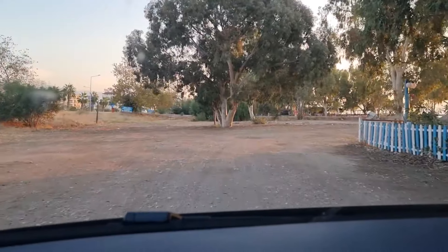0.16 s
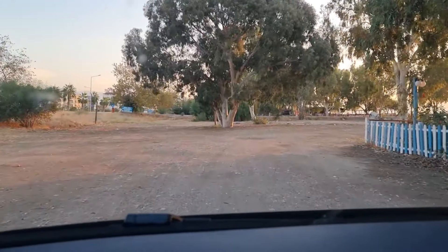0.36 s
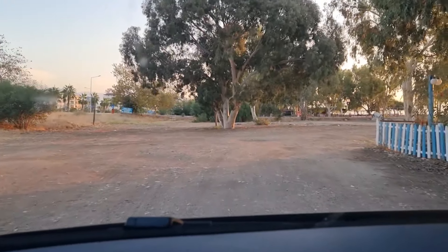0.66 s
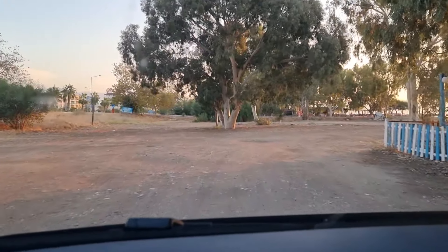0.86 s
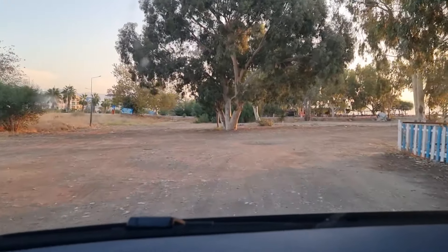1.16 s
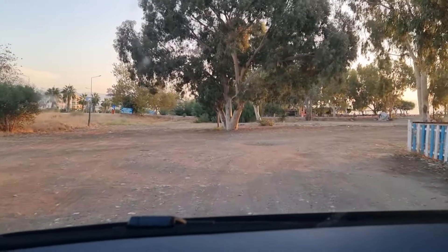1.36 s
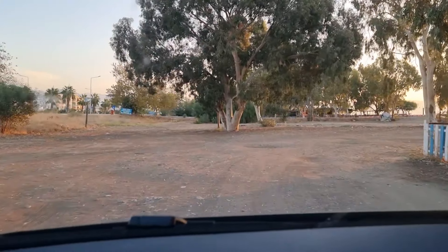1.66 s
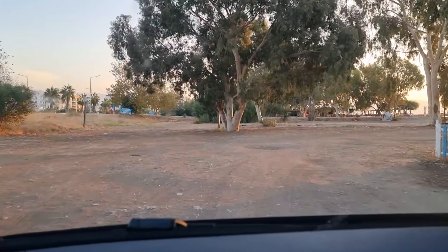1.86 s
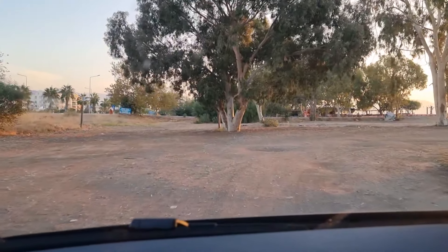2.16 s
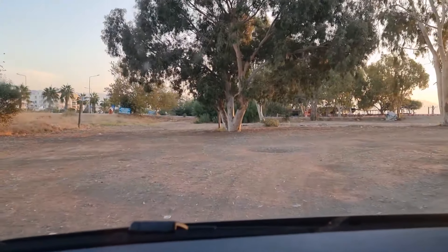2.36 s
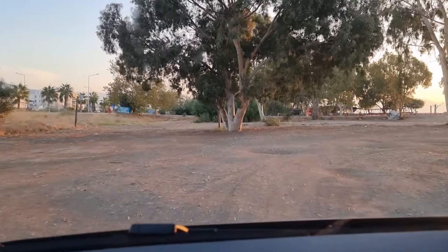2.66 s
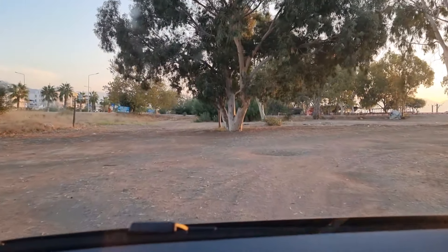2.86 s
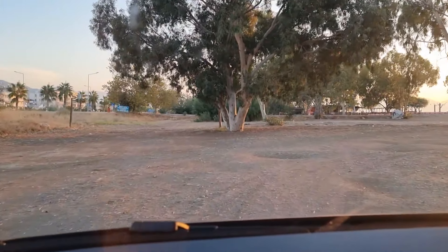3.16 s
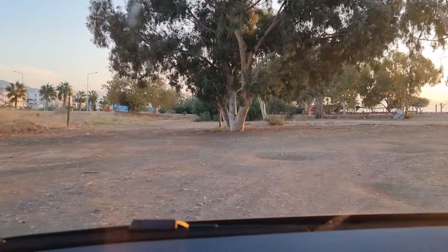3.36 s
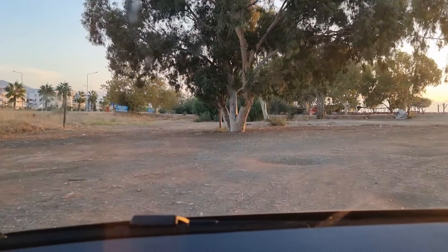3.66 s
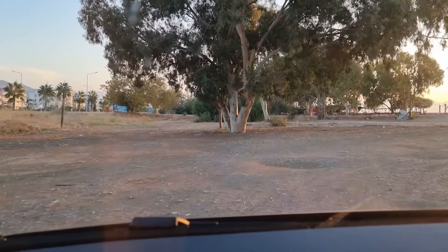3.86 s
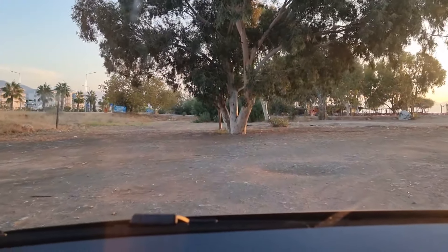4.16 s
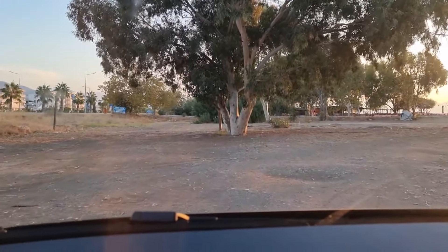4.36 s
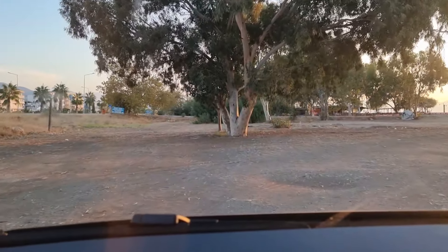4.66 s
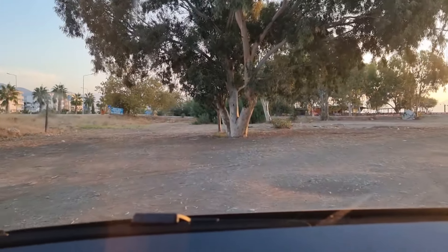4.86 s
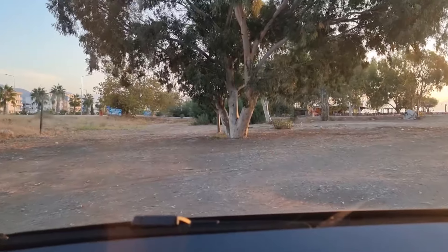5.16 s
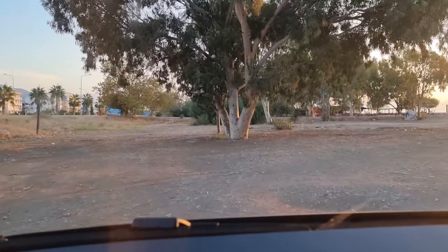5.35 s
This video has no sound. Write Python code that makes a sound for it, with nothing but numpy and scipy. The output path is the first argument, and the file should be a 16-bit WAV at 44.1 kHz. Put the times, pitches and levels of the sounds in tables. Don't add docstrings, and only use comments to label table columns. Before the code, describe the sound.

Inside a slow-rolling small car, deep body boom and tyre rumble over stony dirt, with scattered stone knocks and a growing gravel hiss.

```python
import sys
import numpy as np
from scipy import signal
from scipy.fft import rfft, irfft, next_fast_len
from scipy.io import wavfile
from scipy.ndimage import uniform_filter1d, minimum_filter1d

SR = 44100
rng = np.random.default_rng(int(sys.argv[2]) if len(sys.argv) > 2 else 0)


def makeup_ratio(level_db):
    decades = np.asarray(level_db, float) / 20
    return 10 ** decades


def int16_out(signal):
    q = np.round(np.clip(np.atleast_2d(signal).T, -1, 1) * 32767)
    wavfile.write(sys.argv[1], SR, q.astype(np.int16))


N = 242726
SECONDS = np.arange(N) / SR


def evened(x):
    return x / np.sqrt(np.mean(x ** 2) + 1e-20)


def read(points, hz):
    f, value = np.transpose(points)
    return np.interp(np.log(hz + 1), np.log(f + 1), value)


def curves(rows):
    s, *columns = np.transpose(rows)
    return [np.interp(SECONDS, s, c) for c in columns]


def ring(x, modes):
    out = np.zeros(x.shape)
    for k, (hz, width, db) in enumerate(modes):
        b, a = signal.iirpeak(hz, hz / (1.79 * width), SR)
        twice = signal.lfilter(b, a, signal.lfilter(b, a, x))
        out += (-1) ** k * makeup_ratio(db) * twice / np.sqrt(width)
    return out


def follow(x, hz, width):
    turn = np.exp(2j * np.pi * np.cumsum(hz) / SR)
    r = np.exp(-np.pi * width / SR)
    smooth = signal.lfilter([1], np.convolve([1, -r], [1, -r]), x / turn)
    return (turn * smooth).real


def dulled(x):
    return signal.sosfilt(signal.butter(6, 7800, fs=SR, output="sos"), x)


# (t/s, level/dB)
ROUGHNESS = [(0, 2.5), (.5, 0.5), (1, 2), (1.6, 1), (2.2, -0.5), (2.8, -1.5), (3.5, -2), (4.3, -1),
             (4.9, -2), (5.5, -4)]


def roughness_db():
    return curves(ROUGHNESS)[0]


# (t/s, firing f/Hz, level/dB of the tone at four times that pitch)
FIRING = [(0, 60.04, -63), (1, 59.5, -51.5), (2.2, 62.5, -58), (2.7, 60.21, -51.5), (3.1, 57.97, -50.5),
          (3.6, 56.14, -49), (4.2, 54.91, -51.5), (4.6, 57.53, -54.5), (5.5, 54.2, -50.5)]
# (t/s, f/Hz, level/dB)
PUMP_WHINE = [
    (0, 247.6, -63),
    (3.3, 248.9, -62),
    (3.8, 249.2, -51),
    (4.5, 245.5, -55.5),
    (5.5, 244, -53),
]


def engine():
    (firing_hz, fourth_db), (pump_hz, pump_db) = curves(FIRING), curves(PUMP_WHINE)
    turn = 2 * np.pi * np.cumsum(firing_hz) / SR
    tones = makeup_ratio(-36) * np.sin(turn) + makeup_ratio(fourth_db) * np.sin(4 * turn)
    wavering_db = pump_db + 2.2 * np.sin(2 * np.pi * 2.3 * SECONDS)
    tones += makeup_ratio(wavering_db) * np.sin(2 * np.pi * np.cumsum(pump_hz) / SR)
    return np.sqrt(2) * np.array([tones, np.roll(tones, 40)])


# (t/s, f/Hz, level/dB, time to fade by 60 dB/s)
CLEAR_NOTES = [(.045, 5930, -64, .04), (.2325, 3180, -46.5, .03), (.234, 770, -43, .04),
               (.2365, 1756, -40, .06), (.2349, 2340, -48, .02), (.242, 15560, -65, .025),
               (.243, 13200, -66, .045), (.2625, 1550, -46, .015), (.5, 7200, -63, .025),
               (.5795, 2600, -52, .02), (.659, 2510, -47, .02), (.68, 6500, -65, .035),
               (.735, 7000, -64, .025), (.98, 1800, -49, .025), (1.065, 2440, -48, .025),
               (1.31, 347, -39.5, .12), (1.3205, 3050, -28.5, .022), (1.3225, 2700, -30.5, .028),
               (1.3225, 5070, -37, .025), (1.324, 4100, -42, .02), (1.33, 451, -40, .06),
               (1.3315, 2900, -39, .022), (1.5285, 4200, -51.5, .018), (1.5295, 2890, -52.5, .025),
               (1.984, 3210, -53, .1), (2.131, 1500, -45.5, .06), (2.563, 3800, -58, .02),
               (2.64, 6700, -64.5, .03), (2.971, 4500, -52.5, .04), (2.974, 7740, -54.5, .027),
               (3.0935, 1816, -37, .015), (3.0938, 2700, -35, .014), (3.0938, 3200, -43, .01),
               (3.094, 1300, -39, .018), (3.094, 720, -42, .025), (3.0945, 2050, -43, .03),
               (3.096, 420, -39, .034), (3.97, 6700, -58, .04), (4.3, 1410, -48, .07),
               (4.38, 10400, -71, .04)]


def pings():
    echo_s, attack_s = 0.0001, 0.00098
    out = np.zeros((2, N))
    for s, hz, db, t60 in CLEAR_NOTES:
        t = np.maximum(SECONDS - s - np.array([[0], [echo_s]]), 0)
        out += makeup_ratio(db - 60 * t / t60) * (1 - np.exp(-t / attack_s)) * np.sin(2 * np.pi * hz * t)
    return out


def thrown(hits, modes, lasting, sharp):
    t60_s, rattle_rise_s = 0.056 * lasting, 0.0023
    t = np.arange(6000) / SR
    blows = np.zeros((2, N + len(t)))
    strike = sharp * np.array([t == t[4], t == t[40]])
    for s, db in hits:
        clumps_db = -0.5 + 4 * evened(uniform_filter1d(rng.standard_normal(len(t)), size=90))
        grains = makeup_ratio(clumps_db) * rng.standard_normal((2, len(t)))
        rattle = strike + (1 - np.exp(-t / rattle_rise_s)) * grains
        at = round(s * SR)
        blows[:, at:at + len(t)] += makeup_ratio(db - 4.0 - 60 * t / t60_s) * rattle
    usual = np.std(ring(rng.standard_normal(8000), modes))
    return ring(blows[:, :N], modes) / usual


# (t/s, level/dB, bright part over dull part/dB)
DRY_TAPS = [(0.2644, -51, -12), (0.4242, -52, -11), (0.481, -52, -3), (0.5083, -54, -3), (0.5794, -47, 4),
            (.659, -50.5, 1), (0.852, -54, -12), (0.9424, -48, 3), (0.963, -43.5, 0), (1.0198, -48, -9),
            (1.528, -55, 5), (1.6458, -57, 5), (2.1277, -51.5, -7), (2.767, -52, -6), (3.0935, -45.5, 2),
            (3.0964, -37.5, -15), (3.0997, -39, -17), (4.505, -47, -8), (4.6776, -34.5, -10)]
# (f/Hz, width/Hz, level/dB)
DULL_KNOCK = [(380, 490, -0.5), (765, 500, 0), (1530, 430, 0.5)]
BRIGHT_EDGE = [(2750, 460, 7), (4600, 2300, -11), (6800, 1500, -15)]


def taps():
    s, db, bright_db = np.transpose(DRY_TAPS)
    knock = thrown(zip(s, db), DULL_KNOCK, 0.25, 13.0)
    edge = thrown(zip(s, db + bright_db), BRIGHT_EDGE, 0.17, 3.2)
    return dulled(knock + edge)


# (t/s, level/dB)
SHATTERING = [(.2097, -82), (.2354, -68.5), (0.2483, -74), (1.041, -76), (1.065, -77), (1.3236, -76),
              (1.8254, -83), (1.9994, -88.5), (2.974, -75), (3.97, -78), (4.05, -78), (4.24, -84),
              (4.64, -81), (4.3775, -68), (4.5045, -72), (5.051, -92), (5.1586, -66.5)]
# (t/s, level/dB)
FINE_SHARDS = [(.236, -77.5), (4.042, -88), (4.38, -76.5), (4.506, -88.5), (5.042, -72.5), (5.17, -76.5)]
# (f/Hz, width/Hz, level/dB)
SPLINTER_RING = [(10200, 1100, 0), (12600, 1100, 1)]
SHARD_RING = [(13900, 600, -2), (15300, 400, 0)]


def splinters():
    return thrown(SHATTERING, SPLINTER_RING, 1.0, 1.5) + thrown(FINE_SHARDS, SHARD_RING, 0.9, 1.5)


# (t/s, blow level/dB, thud over crack/dB, chip over crack/dB)
THROWN_STONES = [(.0465, -43, -4, -13), (.2097, -59, 14.5, -24.5), (.2324, -45.5, 3, -12),
                 (.2441, -49, 5, -6), (.4995, -56.5, 10.5, -3), (.5786, -49.5, -3, -16),
                 (.659, -42.5, -0.5, -19.5), (.6779, -50.5, -3.5, -5), (.941, -49, 5.5, -13),
                 (.9622, -51, 5.5, -10.5), (1.0655, -42, -3, -14), (1.0813, -53.5, -2, -2),
                 (1.2636, -55.5, 10.5, -5), (1.3204, -31, -19.5, -9), (1.3235, -44, -31, 3),
                 (1.3312, -44, -15, -6), (1.5094, -58, 16.5, -11), (1.5284, -51.5, 7, -7.5),
                 (1.8257, -56.5, 5, -2.5), (1.9829, -48.5, 1.5, -9), (1.9994, -54.5, -6, -0.5),
                 (2.563, -61, 7.5, 0.5), (2.974, -51, -6, -3), (3.0938, -39.5, 1.5, -25),
                 (3.1174, -54, -4, -6), (4.05, -50.5, 6, -6), (4.3781, -53.5, 12.5, -13),
                 (4.5041, -54.5, 16, 0), (4.677, -40.5, 2, -18), (5.1581, -49.5, 7, -3)]
# (t/s, blow level/dB)
SMALL_PEBBLES = [(0.425, -62.5), (.508, -55), (.735, -55.5), (0.922, -51.5), (1.041, -55), (1.9635, -52),
                 (2.131, -52.5), (2.41, -51.5), (2.6511, -55), (2.9601, -63), (3.3287, -51.5),
                 (3.888, -57.5), (4.2394, -57.5), (5.0614, -55.5)]
# (f/Hz, width/Hz, level/dB)
CRACK_RING = [(2230, 720, -4), (2547, 180, 4.5), (3040, 1100, -2.5), (3180, 400, 3)]
THUD_RING = [(473, 250, 1), (805, 520, -3), (1193, 500, 1.5), (1490, 730, -0.5)]
CHIP_RING = [(3680, 580, 1.5), (4430, 900, 0.5), (5150, 190, -5), (5700, 510, -6), (7000, 1200, -6)]


def stones():
    pebble_thud_db, pebble_chip_db = 4, -13.5
    rows = THROWN_STONES + [(s, db, pebble_thud_db, pebble_chip_db) for s, db in SMALL_PEBBLES]
    s, db, thud_db, chip_db = np.transpose(rows)
    pan = thrown(zip(s, db), CRACK_RING, 0.63, 4.9)
    pan += thrown(zip(s, db + thud_db), THUD_RING, 1.4, 7.0)
    pan = signal.sosfilt(signal.butter(4, 3700, fs=SR, output="sos"), pan)
    return pan + dulled(thrown(zip(s, db + chip_db), CHIP_RING, 1.0, 4.4))


# (f/Hz, width/Hz, level above the rest/dB)
CABIN_PEAKS = [(308, 95.5, 22), (542.5, 100, 7.5), (1040, 89, 2), (1382, 270, 8), (1770, 120, -1),
               (2460, 73, 4), (3740, 39, -0.5), (4700, 180, -0.5), (4980, 220, 2), (5415, 60, 3),
               (5540, 60, 1.5), (5900, 90, 3), (6340, 200, 3.5), (7500, 60, 3)]


def noise(spectrum, patchy_db, flicker_db, ripple_db):
    frames, hz = N // 256 + 5, np.fft.rfftfreq(1024, 1 / SR)
    re, im = rng.standard_normal((2, 2, frames, 513)).transpose(0, 1, 3, 2)
    patches = uniform_filter1d(rng.standard_normal((frames, 513)), 12, 0)
    patches = evened(uniform_filter1d(patches, 12, 1)).T
    ripple = evened(uniform_filter1d(rng.standard_normal((513, 1)), size=2, axis=0))
    flicker = evened(uniform_filter1d(rng.standard_normal(frames), 5))
    peaks_db = sum(db / (1 + (2 * (hz - f) / width) ** 2) for f, width, db in CABIN_PEAKS)
    chance_db = patchy_db * patches + flicker_db * flicker + ripple_db * ripple
    level = makeup_ratio((read(spectrum, hz) + peaks_db)[:, None] + chance_db)
    sound = signal.istft((re + 1j * im) * level, nperseg=1024, noverlap=768)[1]
    return evened(sound[:, :N])


# (f/Hz, level per Hz/dB)
FINE_GRIT = [(260, -24), (450, -1.5), (497, -7.5), (758, 0), (858, -20), (1030, 4.5), (1200, -16.5),
             (1870, -5), (2260, -7), (2600, -3.5), (3200, -4), (3900, -9.5), (4400, -18), (4900, -20.5),
             (5600, -26.5), (6100, -22.5), (6560, -18.5), (7300, -21.5), (8720, -38.5), (11300, -68),
             (19200, -120)]


def crunch(per_s, spread_db, cycles):
    hit = rng.random((2, N)) < per_s / SR
    size = hit * makeup_ratio(spread_db * np.minimum(rng.exponential(1, (2, N)), 2.2))
    kind = rng.integers(0, 24, (2, N))
    t, out = np.arange(1500) / SR, np.zeros((2, N))
    pitches = np.geomspace(900, 8000, 24) * rng.uniform(1.0, 1.05, 24)
    for k, hz in enumerate(pitches):
        grain = np.sin(2 * np.pi * hz * t) * np.exp(-t * hz / cycles)
        grain *= makeup_ratio(read(FINE_GRIT, hz)) * np.sqrt(hz)
        out += signal.oaconvolve(size * (kind == k), grain[None])[:, :N]
    return evened(out)


def dust(share):
    puffs_db = 2.6 * evened(uniform_filter1d(rng.standard_normal(N), size=3000))
    puffs_db += 14 * np.minimum(share, 0.3) / 0.57
    air = ring(rng.standard_normal((2, N)), [(9500, 1200, 0), (11400, 1300, -1)])
    air = signal.sosfilt(signal.butter(16, 12000, fs=SR, output="sos"), air)
    return makeup_ratio(puffs_db + 6.0 * share - 58) * evened(air)


# (t/s, level/dB)
ARCH_STREAM = [(0, -76), (3.6, -62.5), (4.3, -56), (4.45, -57.5), (4.7, -58.5), (4.87, -54.5), (4.97, -55),
               (5.02, -71), (5.5, -85)]


def wheel_arch():
    modes = [(1763, 140, 0.0054), (1936, 210, 0.0057)]
    return makeup_ratio(curves(ARCH_STREAM)[0]) * evened(ring(rng.standard_normal((2, N)), modes))


# (t/s, level/dB, fine grit share 0-1)
TYRE_HISS = [(0.0, -60.5, 0), (0.47, -63.5, 0.02), (1.3, -56.5, 0.08), (1.84, -60, 0.09), (2.31, -58, 0),
             (2.48, -56.5, 0.05), (3.09, -54, 0.3), (3.52, -56, 0.05), (3.89, -51, 0.18), (4.14, -48, 0.05),
             (4.45, -49, .3), (4.75, -48, .4), (5.0, -48, 0.5), (5.2, -47, 0.9), (5.5, -46, 0.92)]
# (f/Hz, level per Hz/dB)
COARSE_GRAVEL = [(260, -45), (450, -13.5), (600, 2.5), (760, -4), (870, -17), (1020, -8), (1240, -14),
                 (1440, -3), (2460, -4), (3100, -5.5), (3900, -9.5), (4500, -16), (5000, -24),
                 (5500, -32.5), (6500, -32.5), (7330, -28), (8720, -47), (11300, -78.5), (19200, -120)]
# (f/Hz, level per Hz/dB)
CARPET_ROAR = [(240, -23), (390, -4.5), (460, -6), (515, 0), (679, -10.5), (800, -7.5), (913, -12.5),
               (1210, -13), (1380, -17), (1590, -17.5), (1760, -10), (3700, -31.5), (5100, -36),
               (7280, -42), (8720, -49.5), (11300, -81.5), (19200, -120)]


def tyres():
    level_db, share = curves(TYRE_HISS)
    share = np.clip(share, 0, 1)
    hiss = np.sqrt(1 - share) * noise(COARSE_GRAVEL, 2.0, 0.7, 1.1)
    hiss += np.sqrt(share) * noise(FINE_GRIT, 2.2, 0.8, 1.1)
    hiss += makeup_ratio(-9) * dulled(crunch(600, 4.2, 3.0))
    hiss += dust(share)
    roar = makeup_ratio(-51.5 + 0.57 * roughness_db()) * noise(CARPET_ROAR, 2.2, 0.74, 0.84)
    return roar + makeup_ratio(level_db - 1.5) * hiss + wheel_arch()


def steadied(x, hold, seconds):
    power = uniform_filter1d(x ** 2, int(seconds * SR), axis=-1)
    return evened(x / (abs(power) + 1e-12) ** (hold / 2))


def shaken(bumps, rest_db, share, rise_s, fall_s):
    power = makeup_ratio(2 * (rest_db + share * roughness_db()))
    for s, db, *_ in bumps:
        t = SECONDS - s
        power = power + makeup_ratio(2 * db) * np.exp(-(t / np.where(t < 0, rise_s, fall_s)) ** 2)
    return np.sqrt(power)


def woken(jolts, x, modes, width, chosen_db):
    times, _, pitches = np.transpose(jolts)
    nearest = np.round(np.interp(SECONDS, times, np.arange(len(jolts)))).astype(int)
    chosen = follow(x[:, ::-1], pitches[nearest], width)
    return evened(ring(x, modes)) + makeup_ratio(chosen_db) * evened(chosen)


# (t/s, level/dB, boom f/Hz)
FLOOR_FLEXES = [(0.015, -23.5, 42.4), (0.232, -21.5, 37.7), (0.415, -21.5, 41), (0.639, -23.5, 37.75),
                (0.79, -20.5, 41.5), (0.92, -18.5, 42.9), (1.053, -17, 40.2), (1.38, -25.5, 41.1),
                (1.497, -17.5, 43.5), (1.59, -22, 44.5), (1.74, -26, 37.66), (1.913, -20.5, 37.6),
                (2.556, -18.5, 38.04), (2.788, -27, 40.84), (2.896, -24.5, 39.6), (3.0, -33, 39.2),
                (3.261, -27.5, 42.6), (3.404, -27.5, 36.9), (3.568, -22.5, 44), (3.81, -25, 37.2),
                (4.022, -29.5, 32.1), (4.112, -27, 31.44), (4.252, -28.5, 39), (4.347, -27.5, 38.7),
                (4.653, -31, 42), (4.983, -29.5, 37.56), (5.152, -26.5, 38.1), (5.417, -29.5, 37.6)]
ROOF_PUMPS = [(0.125, -22, 60.6), (0.329, -21, 61.1), (0.407, -24, 60.8), (0.487, -23, 61.3),
              (0.56, -28.5, 65.2), (0.675, -27, 64.5), (0.798, -30.5, 57.4), (0.915, -22, 57.5),
              (1.008, -20.5, 61.5), (1.102, -23, 61.25), (1.211, -26.5, 62.8), (1.315, -23.5, 58.3),
              (1.496, -21.5, 58.1), (1.632, -23, 60.4), (1.721, -24, 57.5), (1.991, -18.5, 61.5),
              (2.166, -23.5, 66.3), (2.262, -22.5, 58.55), (2.389, -28.5, 64), (2.52, -23, 61.7),
              (2.6, -19.5, 58.9), (2.691, -25, 59.6), (2.948, -26, 60.7), (3.049, -31.5, 58.5),
              (3.145, -25, 58.5), (3.229, -32.5, 53.7), (3.406, -26, 59.2), (3.523, -30, 60.9),
              (3.604, -28, 62), (3.835, -28.5, 56.8), (3.922, -26.5, 60.8), (4.023, -27, 62.7),
              (4.37, -27.5, 59.8), (4.599, -26.5, 59.1), (4.711, -34, 63), (4.814, -33, 58.1),
              (5.043, -25, 61.4), (5.213, -29.5, 57.9), (5.31, -33.5, 62.6), (5.471, -22, 61.1)]
# (t/s, level/dB, f/Hz of the pitch each one strikes)
DOOR_DRUMMING = [(0.111, -26.5, 104.6), (0.178, -32, 106.2), (0.249, -31.5, 90.6), (0.312, -29, 104.3),
                 (0.426, -24.5, 108.5), (0.506, -29.5, 83.8), (0.62, -25, 106), (0.767, -33, 87),
                 (0.845, -28.5, 96.6), (0.971, -28, 85.9), (1.055, -28, 100.4), (1.125, -26.5, 91.2),
                 (1.208, -30.5, 77.5), (1.304, -29, 83.7), (1.474, -30, 105.4), (1.604, -28, 86.1),
                 (1.752, -27, 81.5), (1.907, -32, 101.8), (2.023, -33, 87.2), (2.117, -33, 105.6),
                 (2.205, -34, 89), (2.333, -33, 94.5), (2.418, -30.5, 88.3), (2.582, -29, 80.9),
                 (2.703, -33.5, 87.4), (2.888, -27.5, 80.5), (3.152, -28.5, 89.2), (3.326, -30.5, 87.9),
                 (3.399, -32.5, 107.3), (3.516, -30.5, 86.8), (3.676, -37, 98.8), (3.826, -27.5, 87.6),
                 (3.961, -31, 88.4), (4.072, -31.5, 94.6), (4.198, -32, 90.9), (4.285, -29.5, 86),
                 (4.347, -31, 102.9), (4.558, -30, 93), (4.794, -35.5, 83.5), (4.874, -30.5, 89.2),
                 (4.992, -27, 84.5), (5.054, -32.5, 98), (5.143, -30, 87), (5.416, -30.5, 102.8)]
PANEL_DRUMMING = [(0.073, -36.5, 155), (0.14, -38, 153.2), (0.329, -39, 128), (0.399, -39, 205.4),
                  (0.507, -37.5, 149.5), (0.747, -39.5, 141.7), (0.813, -38.5, 147.5),
                  (0.912, -38.5, 133.6), (1.055, -39, 177.4), (1.164, -33.5, 132), (1.419, -32.5, 172.7),
                  (1.539, -37.5, 147.7), (1.655, -40, 134.6), (1.746, -37.5, 151.4), (2.202, -44, 200.4),
                  (2.288, -39.5, 146), (2.381, -38.5, 126), (2.638, -40.5, 218.3), (2.841, -35.5, 148.5),
                  (2.952, -40.5, 132), (3.117, -36.5, 148.7), (3.35, -33.5, 203.6), (3.95, -43.5, 150.6),
                  (4.285, -35, 225.4), (4.633, -42.5, 149.4), (4.73, -36.5, 173), (4.84, -38, 174.3),
                  (4.934, -36.5, 145.4), (5.13, -33, 172.3), (5.196, -33.5, 147.7)]
# (f/Hz, width/Hz, level/dB)
DOOR_RING = [(70.7, 3.1, -6), (88.7, 5.4, 3.5), (111.5, 11, 3.5), (117.4, 13, -5.5)]
PANEL_RING = [(136.2, 18, 3.5), (168.7, 27, -1), (210, 19, -0.5), (244, 28, -6.5), (305, 37, -8),
              (420, 36, -16.5)]
# (level between bumps/dB, share of the roughness, rise/s, fall/s)
SWELLS = [
    (-33, 0.28, .045, 0.029),
    (-35, 0.75, 0.034, 0.046),
    (-36, 0.74, 0.021, 0.019),
    (-43, 0.88, 0.013, 0.013),
]


def shell():
    floor_hz, roof_hz = curves(FLOOR_FLEXES)[1], curves(ROOF_PUMPS)[1]
    floor, roof, doors, panels, seats = rng.standard_normal((5, 2, N))
    deep = evened(follow(floor, floor_hz, 9.5))
    deep += makeup_ratio(-10.5) * evened(ring(seats, [(27.4, 11, 0)]))
    high = follow(roof, roof_hz, 8.64)
    door = woken(DOOR_DRUMMING, doors, DOOR_RING, 8, 5)
    panel = woken(PANEL_DRUMMING, panels, PANEL_RING, 18, -5.0)
    parts = deep, high, door, panel
    bumps = FLOOR_FLEXES, ROOF_PUMPS, DOOR_DRUMMING, PANEL_DRUMMING
    return sum(shaken(b, *swell) * steadied(part, 0.83, 0.12) for b, swell, part in zip(bumps, SWELLS, parts))


def scene():
    return engine() + pings() + taps() + splinters() + stones() + tyres() + shell()


def limited(x):
    limit, span = 0.33, round(0.012 * SR)
    gain = np.minimum(1, limit / (abs(x).max(0) + 1e-9))
    dip = minimum_filter1d(gain, 2 * span)
    return x * uniform_filter1d(uniform_filter1d(dip, span), span)


# (f/Hz, likeness 0-1)
PORTS_ALIKE = [(40, .985), (90, .965), (170, .92), (260, .72), (345, .2), (520, .62), (860, .8),
               (1300, .52), (1800, .66), (2150, .45), (2800, .68), (4700, .45), (6000, .58), (8000, .25),
               (11000, .3)]
# (f/Hz, left leads/radians)
LEFT_LEADS = [(0, .3), (190, .2), (255, .05), (340, 1.5), (450, 2.5), (700, 2.7), (1500, 3.1), (1900, 2.8),
              (2350, 4.1), (3750, 6.4), (5150, 8.7), (6000, 10.4), (7100, 11.5), (8400, 13.4), (12000, 19)]
# (f/Hz, left minus right/dB)
LEFT_LOUDER = [(25, -2.5), (60, -1), (94, 2), (150, 1.5), (230, 6), (360, 1.5), (560, 2), (880, 1),
               (1380, 0), (1800, 5.5), (2160, -1), (3380, 1.5), (5280, -0.5), (8270, 5), (10000, -0.5)]


def ports(dry):
    size = next_fast_len(N + 8192)
    edge = np.interp(np.arange(N + 8192), [0, 4096, N + 4096, N + 8192], [0, 1, 1, 0])
    longer = edge * np.pad(dry, ((0, 0), (4096, 4096)), "reflect")
    hz = np.fft.rfftfreq(size, 1 / SR)
    field, other = rfft(longer, size)
    alike = np.clip(read(PORTS_ALIKE, hz), 0, 1)
    lead = np.interp(hz, *np.transpose(LEFT_LEADS))
    tilt = makeup_ratio(read(LEFT_LOUDER, hz) / 2)
    left = tilt * field * np.exp(0.5j * lead)
    right = (alike * field * np.exp(-0.5j * lead) + np.sqrt(1 - alike ** 2) * other) / tilt
    mean = np.sqrt(tilt ** 2 + tilt ** -2.0 + 2 * alike * np.cos(lead)) / 2
    return irfft(np.array([left, right]) / mean, size)[:, 4096:N + 4096]


def top_cut(x):
    return signal.sosfilt(signal.butter(12, 16200, fs=SR, output="sos"), x)


def record(dry):
    mix = limited(ports(dry))
    return top_cut(mix)


dry = scene()
out = record(dry)
int16_out(out)
```